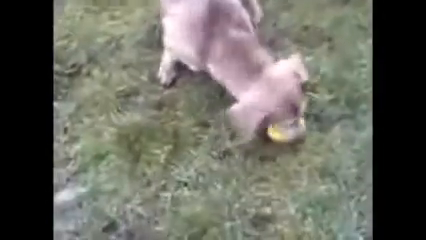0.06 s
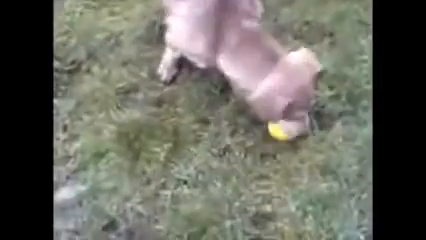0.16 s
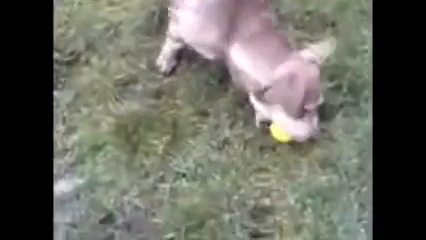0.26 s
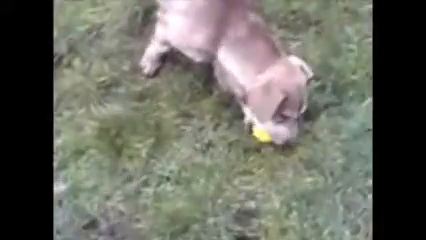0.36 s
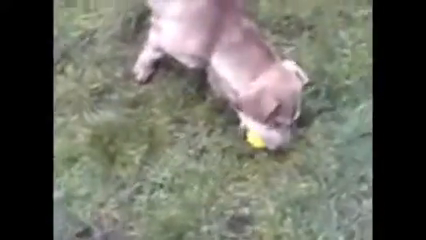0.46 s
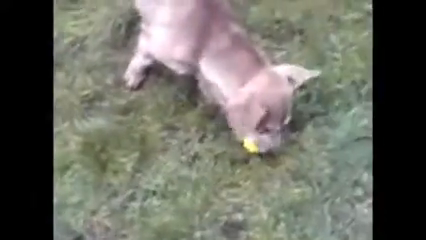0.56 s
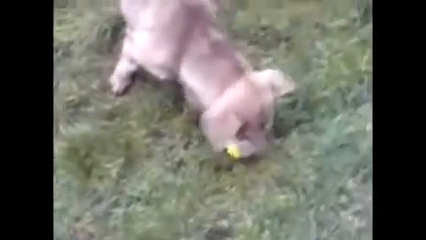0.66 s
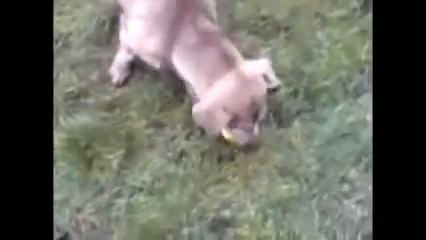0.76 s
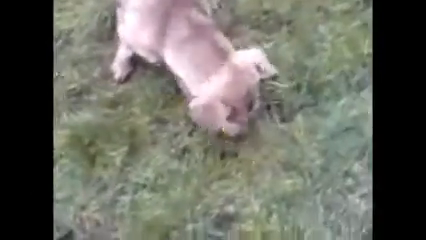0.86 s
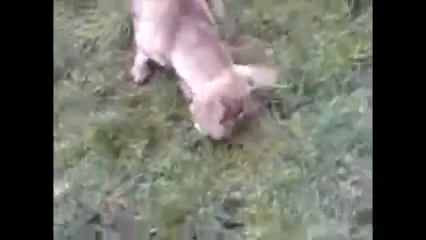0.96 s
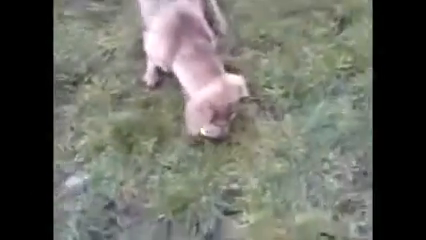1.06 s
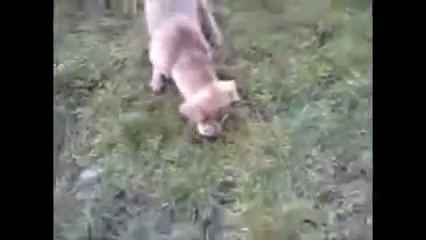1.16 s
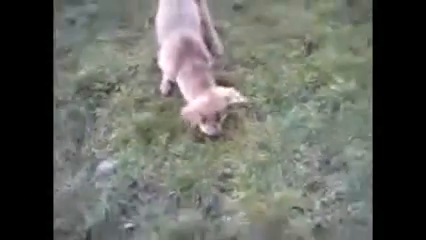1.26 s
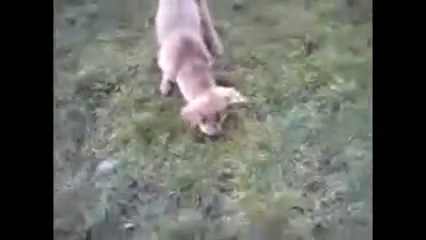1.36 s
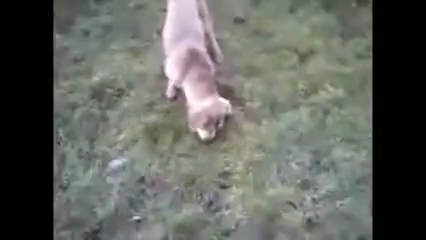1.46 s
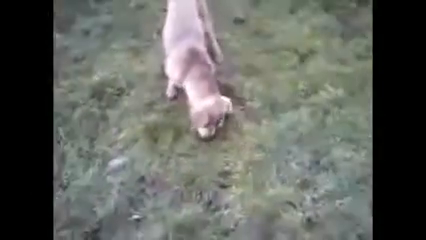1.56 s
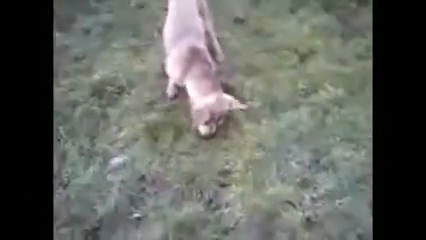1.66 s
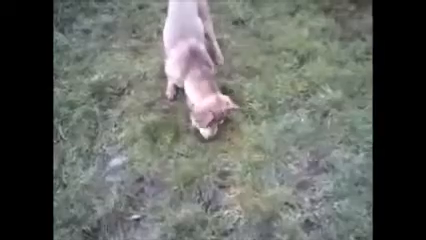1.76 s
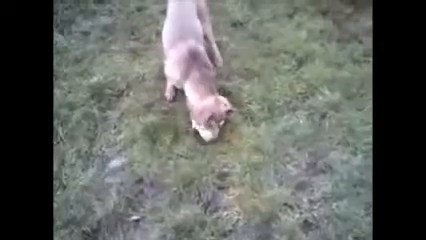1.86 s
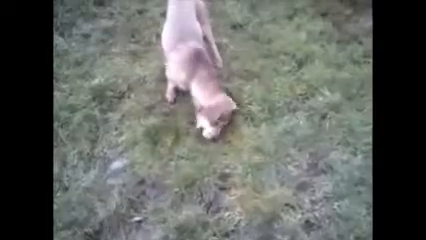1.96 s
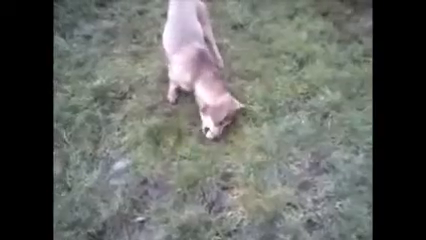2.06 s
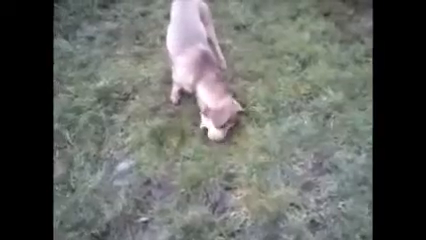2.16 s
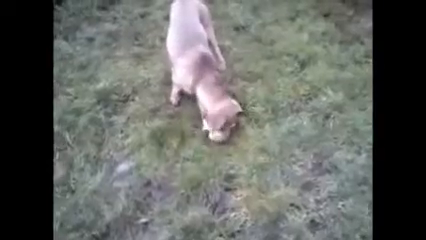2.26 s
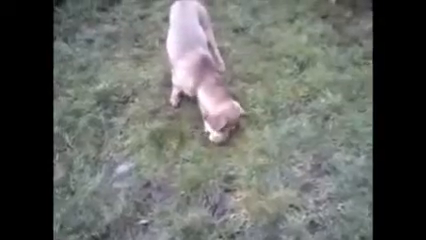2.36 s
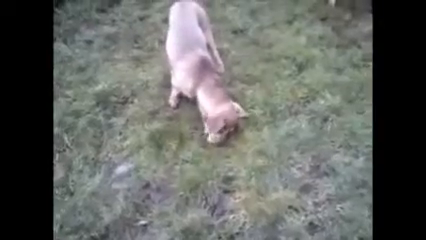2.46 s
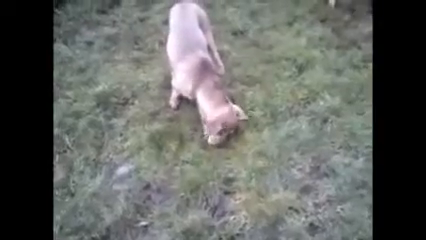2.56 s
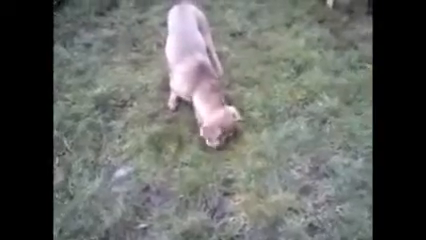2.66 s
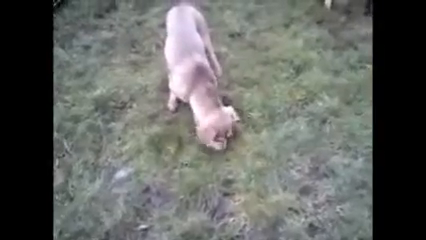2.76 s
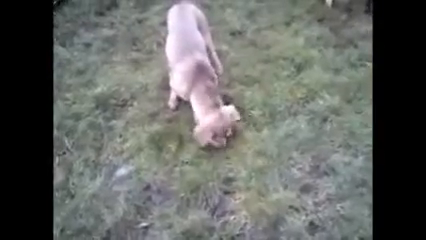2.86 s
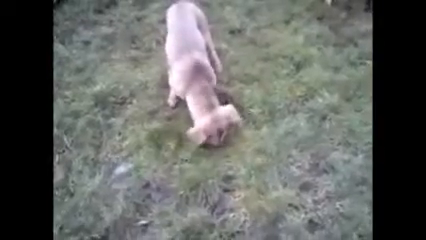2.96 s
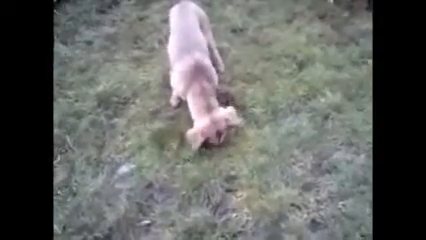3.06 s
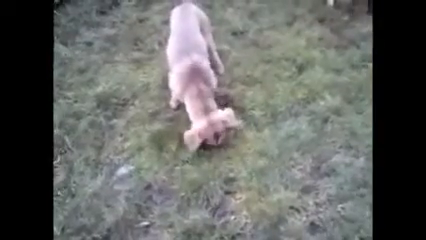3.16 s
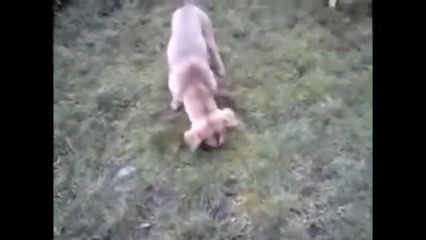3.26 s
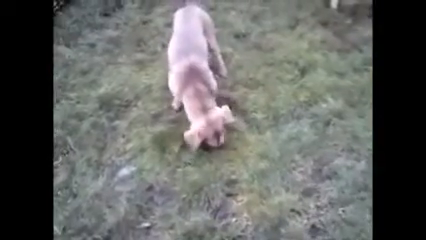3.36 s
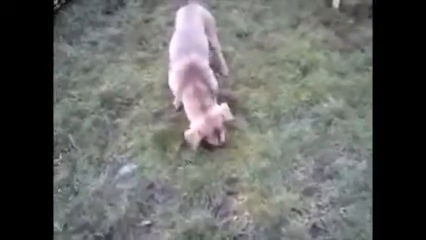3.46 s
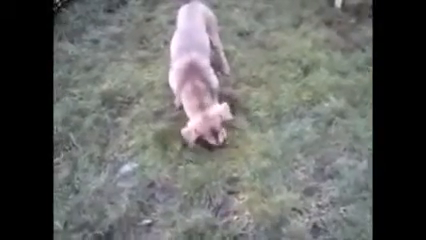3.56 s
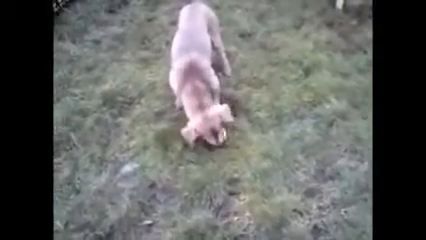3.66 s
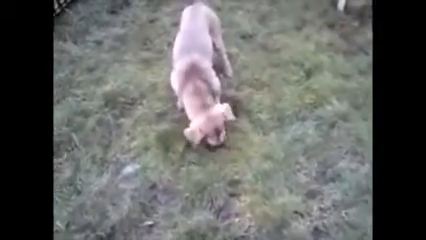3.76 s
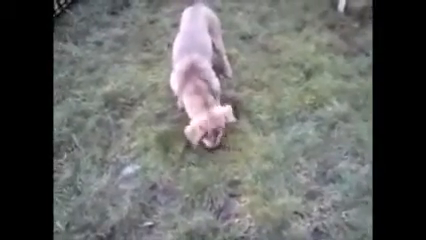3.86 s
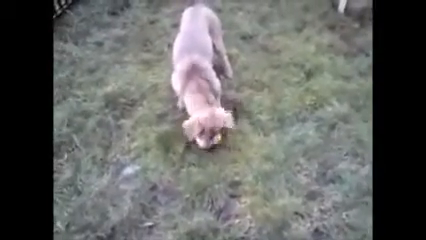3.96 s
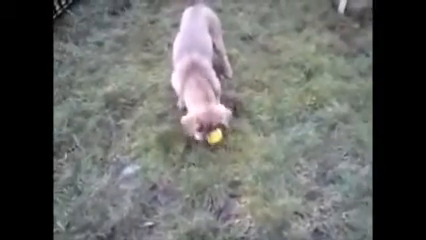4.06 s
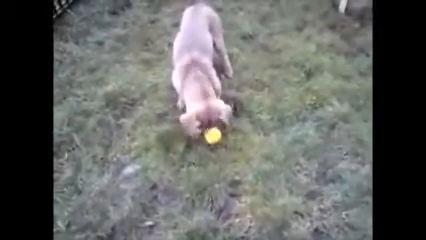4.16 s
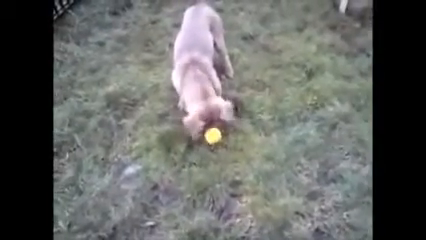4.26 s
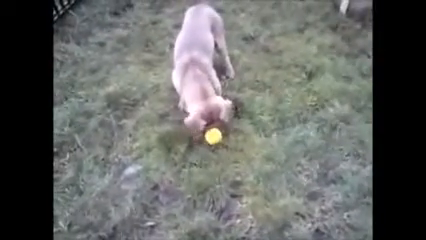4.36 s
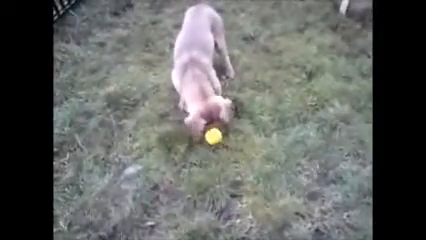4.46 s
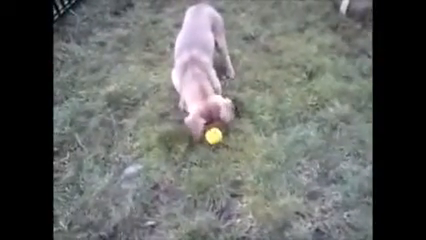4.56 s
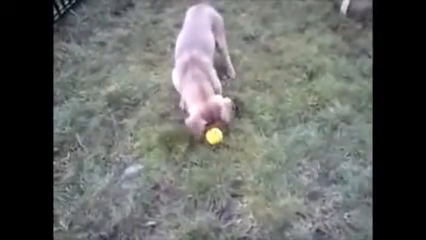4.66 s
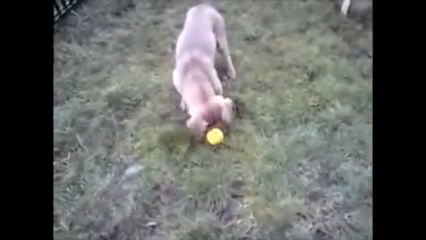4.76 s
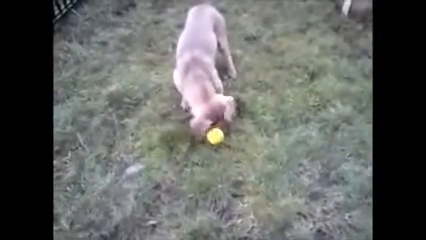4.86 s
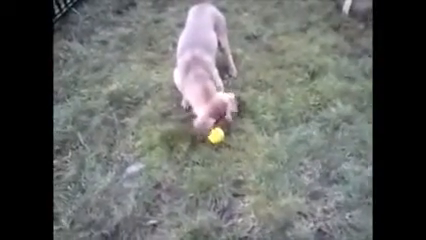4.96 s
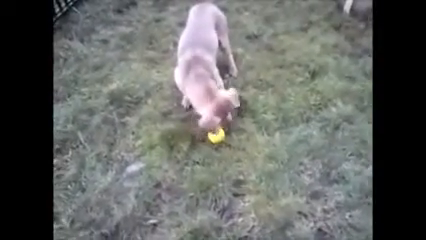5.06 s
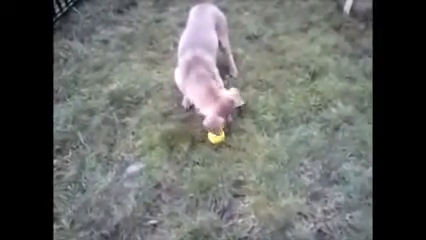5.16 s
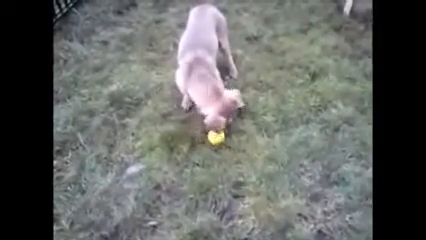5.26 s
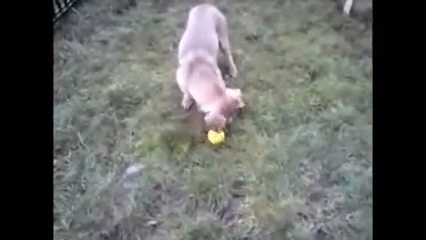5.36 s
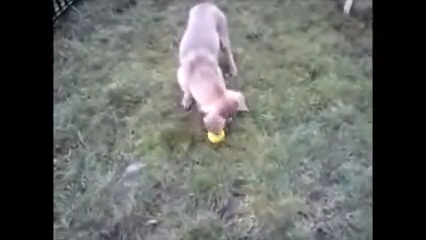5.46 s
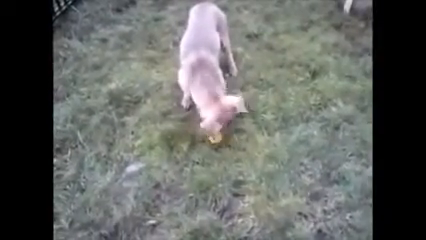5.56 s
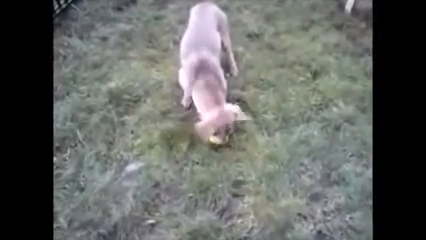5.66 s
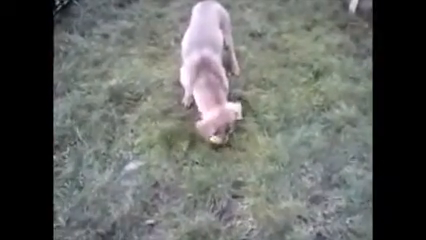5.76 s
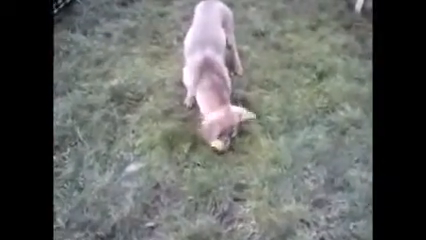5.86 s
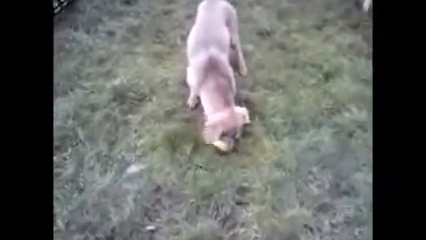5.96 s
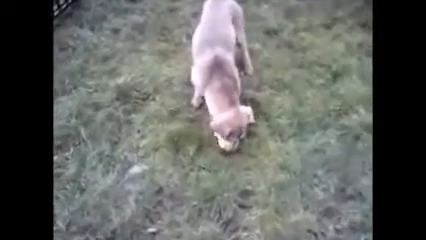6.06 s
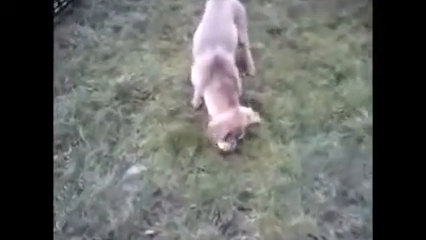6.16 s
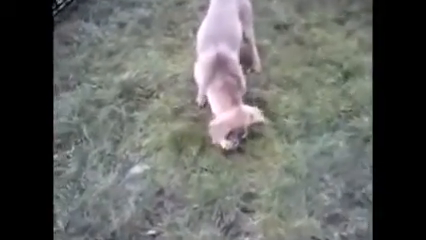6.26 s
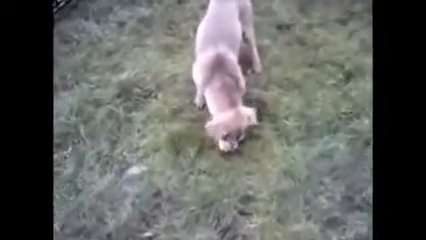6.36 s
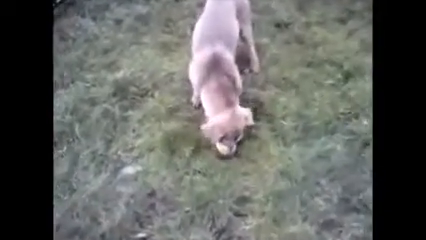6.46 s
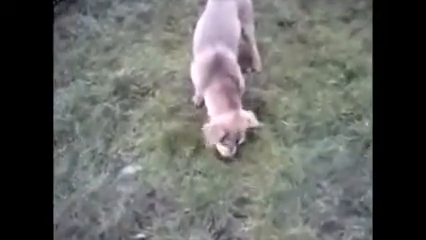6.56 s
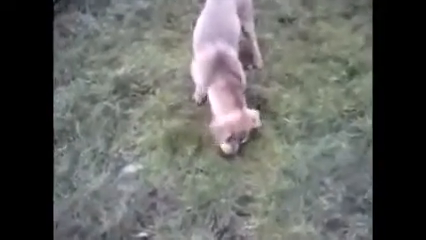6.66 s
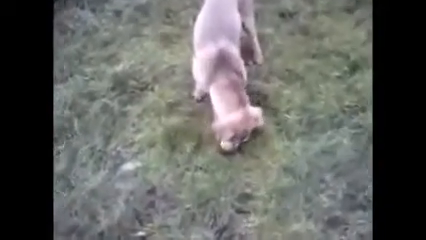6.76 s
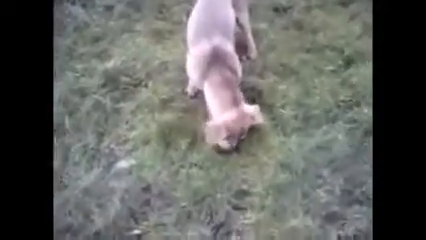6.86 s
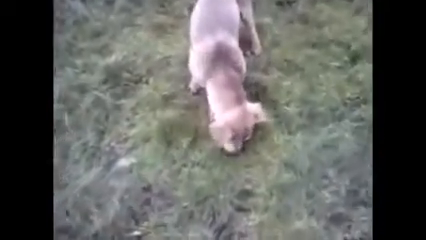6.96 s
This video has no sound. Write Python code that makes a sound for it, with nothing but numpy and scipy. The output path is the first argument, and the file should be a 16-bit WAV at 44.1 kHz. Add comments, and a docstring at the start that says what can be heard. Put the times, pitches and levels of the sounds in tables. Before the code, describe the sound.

Fast, irregular squeaks from a chewed rubber toy, loud and slightly distorted, with short yard echoes. High squeals alternate with lower rasping in-breaths of air that climb and break into whistles, plus airy puffs and soft knocks. The run thins out by four seconds; a calm stretch of low hum, dull outdoor noise and faint distant calls follows, before the squeaking resumes near the end and is cut off mid-squeal. Handheld, lo-fi, automatic gain pumping.

```python
"""A squeaky rubber ball, chewed by a puppy on a lawn: each bite drives air out through the reed,
giving a falling chirp and an arched squeal. The released ball sucks air back with a lower buzz that
climbs, breaks up and ends as a whistle. The reed's harmonics sweep through chamber and tube resonances;
noise bursts make pops and tooth ticks, all echoed by the yard. Dry hiss, thuds, faint calls and an
outdoor wash with a hum are added; gain control ducks everything after loud squeaks."""
import sys
import numpy as np
from scipy import signal
from scipy.fft import rfft, irfft
from scipy.io import wavfile
from scipy.ndimage import uniform_filter1d, map_coordinates

SR = 44100
rng = np.random.default_rng(int(sys.argv[2]) if len(sys.argv) > 2 else 0)


def generate_wav(sig):
    """Save sig (samples, or channels by samples) to the path in sys.argv[1] as 16-bit PCM at SR."""
    pcm = np.round(np.clip(np.atleast_2d(sig).T, -1, 1) * 32767).astype(np.int16)
    wavfile.write(sys.argv[1], SR, pcm)


N = 310023
T = np.arange(N) / SR

# outdoor background before its gain: (time [s], level [dB])
YARD_LEVEL = [(0, -45), (2, -43.5), (3.2, -45), (4.2, -45), (4.7, -49.5), (5.7, -49.5), (6.1, -47),
              (7.03, -45.5)]
# spectrum of the outdoor background: (frequency [Hz], relative level [dB])
YARD_SPECTRUM = [(15, -26.5), (25, -5), (90, -5), (160, -7.5), (310, -11), (440, -12.5), (540, -10.5),
                 (920, -8.5), (1600, -15), (3000, -22.5), (5500, -24.5), (7800, -31.5), (9000, -68.5)]
# soft low thuds: (time [s], half width to 1/e [s], level [dB])
THUDS = [(2.817, 0.02, -34.5), (4.014, 0.039, -40)]
# faint far-off calls: (time [s], length [s], top pitch [Hz], level [dB])
FAR_CALLS = [(0.237, 0.089, 1724, -39.5), (0.346, 0.082, 1480, -37), (4.9, 0.504, 451, -53),
             (5.727, 0.01, 1105, -33), (5.911, 0.094, 715, -36)]
# spectrum of hissing air: (frequency [Hz], relative level [dB])
AIR_SPECTRUM = [(600, -29.5), (1300, 4.5), (2300, 17), (3200, 6), (4300, 9.5), (5600, 10), (7800, 3),
                (9000, -66)]
# air through the hole with the reed silent: (peak time [s], rise [s], fall [s], level before flutter [dB])
PUFFS = [(0.5, 0.061, 0.047, -39), (1.265, .03, 0.074, -24.5), (2.69, 0.06, 0.019, -39),
         (3.11, 0.024, 0.041, -26), (3.234, 0.017, 0.053, -28.5), (3.532, 0.0097, 0.015, -38),
         (5.66, 0.064, 0.12, -51.5), (6.064, 0.084, 0.1, -44), (6.85, 0.037, 0.084, -33)]
# the rubber wall pops in or out: (time [s], level before the common gain [dB])
POPS = [(0.828, -22.5), (0.949, -18), (1.077, -32), (1.521, -24), (1.583, -18.5), (1.808, -21),
        (1.944, -28), (2.905, -24.5), (2.649, -30), (3.063, -26.5), (3.33, -20), (3.791, -27),
        (6.181, -24.5), (6.466, -20), (6.925, -27), (6.99, -15.5)]
# echoes off fences and house: (delay [s], level [dB])
ECHOES = [(.009, -16.5), (0.023, -17.5), (0.032, -38.5), (.052, -33.5)]
# resonances of the ball's chamber: (frequency [Hz], relative level [dB])
CHAMBER_RESPONSE = [(700, 3.5), (1200, -1.5), (1700, 8), (2300, 1), (3000, 2.5), (3800, -7), (4600, -6)]
# turbulence of the reed, which hardly speaks between buzz and whistle: (pitch [Hz], relative level [dB])
BREATHINESS = [(1200, 2.5), (1600, 1.5), (2400, 6), (3000, -0.5), (3900, 9.5), (4700, -9.5), (5500, -7)]
# teeth close, reed flips from whistle to buzz: (time [s], time to flip [s], time after flip [s],
# chamber offset [dB], tube offset [dB], tube resonance [Hz])
CHIRPS = [(0.812, 0.0068, 0.01, -11.5, -1, 4840), (1.289, 0.0058, 0.013, -13.5, -7, 5660),
          (1.781, .0215, 0.0084, -9.5, -24, 5000), (2.660, 0.0034, .012, -9, -43, 6230),
          (6.4844, .009, .011, -13, -9.5, 4900), (6.954, 0.0082, 0.0093, -6.5, -22.5, 5100)]
# chirp pitch at the start, before the flip, after the flip and at the end: (pitch [Hz])
CHIRP_PITCH = (5800, 3480, 1553, 1001)
# chirp's chamber part at those moments: (level before the offset [dB])
CHIRP_CHAMBER = (-25, -6.5, -4, -7)
# chirp's tube part at those moments: (level before the offset [dB])
CHIRP_TUBE = (1, -3.5, -1.5, -21)
# the jaw presses air out: (time [s], rise [s], hold [s], fall [s], first pitch [Hz], crest pitch [Hz],
# pitch as the jaw eases [Hz], last pitch [Hz], base chamber level [dB], base tube level [dB],
# tube resonance [Hz])
SQUEALS = [(0.847, 0.02, 0.12, 0.03, 2237, 2321, 2330, 1884, -6.5, -2, 5120),
           (1.343, .088, 0.092, 0.026, 2328, 2657, 2460, 1903, -6.5, -11.5, 5690),
           (1.824, 0.033, 0.096, 0.02, 2290, 2743, 2490, 1915, -10.5, -5, 5280),
           (2.216, 0.021, 0.065, 0.033, 2400, 2586, 2538, 1958, -14, -8, 5940),
           (2.724, 0.039, 0.18, 0.017, 2730, 2500, 2453, 2343, -15.5, -21, 5930),
           (3.593, 0.067, 0.074, 0.035, 2233, 2234, 2060, 1878, -16.5, -18, 6360),
           (3.846, 0.076, .066, .058, 2156, 2573, 2570, 1935, -12, -18.5, 6070),
           (6.523, 0.046, 0.061, 0.021, 2280, 2567, 2317, 1920, -13, -17, 5570),
           (6.994, 0.051, .020, .020, 2343, 2860, 2800, 2590, -3.5, -0.5, 5370)]
# the ball slips in the jaw and bends the squeal: (time [s], half width to 1/e [s], bend [octaves],
# squareness [exponent])
SLIPS = [(0.866, 0.011, 0.053, 2.7), (0.960, .014, .43, 1), (1.859, 0.012, 0.026, 1.6),
         (2.247, .018, .07, 1.7), (2.822, .008, -0.35, 1.9), (3.625, 0.028, -.23, 4)]
# the jaw lets go, air is sucked back: (time [s], length [s], runaway [s], first pitch [Hz],
# drift [octaves/s], first chamber level [dB], late chamber level before the break [dB],
# tube level before the break [dB], tube resonance [Hz])
BUZZES = [(0.571, 0.053, 0.019, 1226, 6.8, -9, -7, 3, 5440),
          (1.084, .048, 0.014, 1192, 5.2, -21.5, 0, 2, 5130),
          (1.593, 0.081, .016, 1211, 3.2, -16.5, -1.5, -15, 5340),
          (1.996, 0.085, 0.011, 1219, 1.8, -18.5, -9.5, -10.5, 4380),
          (2.403, .066, 0.018, 1160, 2.63, -19, -21.5, -11.5, 5940),
          (3.07, 0.064, 0.023, 1101, 3.12, -26, -11.5, -32, 5900),
          (6.187, 0.091, 0.012, 1169, 0.74, -20.5, -22, -8.5, 5620),
          (6.673, 0.062, 0.023, 1179, 2.5, -16, -1, -11, 5100)]
# little air left to move: (time [s], length [s], first pitch [Hz], last pitch [Hz],
# first tube level [dB], last tube level [dB], tube resonance [Hz])
WHISTLES = [(0.634, 0.037, 5650, 7400, 8, -11, 5300), (1.135, 0.019, 5480, 7180, 4, -3, 5270),
            (1.679, .050, 4620, 5250, -19.5, -16, 5430), (2.48, 0.013, 5240, 5910, -17, 0, 5900),
            (3.154, 0.0084, 5200, 5880, -22, -14, 5760), (3.55, 0.037, 5540, 5380, -34.5, -27.5, 5600),
            (6.285, 0.02, 4600, 5300, -12, 2, 5600), (6.735, .044, 4700, 6160, -9, -7.5, 5140)]
# brief swells and dips of squeals and buzzes: (time [s], half width to 1/e [s], chamber change [dB],
# tube change [dB])
SWELLS = [(0.846, 0.0085, -3, -10), (0.892, 0.04, 1, -14), (0.939, 0.022, 4.5, 7.5),
          (1.367, 0.011, -9.5, -10), (1.405, 0.016, -2, -11), (1.462, 0.018, 1, 6.5),
          (1.824, 0.007, -1, -8), (2.0, 0.011, -1.5, -9), (1.891, 0.027, 0.5, 1.5),
          (2.212, 0.0071, -7.5, 6), (2.233, 0.024, 6, 0), (2.733, .01, 7, 0.5), (2.78, 0.09, -1, 2),
          (2.822, 0.0067, -5.5, -5.5), (2.87, .018, 3.5, 0), (2.945, 0.049, -7, -17.5),
          (3.745, 0.017, -7, -20), (3.843, 0.012, 0, -10), (3.956, 0.044, -21, -6), (4.007, 0.014, 9, 5),
          (6.266, 0.0079, 9.5, -0.5), (6.572, 0.0097, -16, -19)]

FLIP_HALF_S = 0.0017  # half the duration of the chirp's flip
RISE_POWER, SAG_POWER = 1.3, 1.3  # how early the crest is reached; how late in the hold the pitch sags
BRIGHT_DB_PER_OCTAVE = 36.5  # tube level follows pitch, as overtones grow with pressure
STALL_CHAMBER_DB, STALL_TUBE_DB = -4.5, -7.5  # change as the reed stalls
BREAK_HZ, BREAK_CHAMBER_DB, BREAK_TUBE_DB = 3434, -6, -7  # buzz's last pitch; change in the last rush
TUBE_WIDTH_HZ = 460  # offset at which the tube's gain is halved, for all but squeals
SAMPLING_HZ, TOP_HZ = 16000, 8000  # low sampling rate and the top of its band


def undb(db):
    """Logarithmic level: decibels to amplitude gain."""
    return 10 ** (np.asarray(db) / 20)


def unit(x):
    """Mean power: scale to rms 1."""
    return x / np.sqrt(np.mean(x ** 2) + 1e-18)


def colour(hz, points):
    """Frequency response: gain interpolated over log frequency."""
    f, db = np.transpose(points)
    return undb(np.interp(np.log(hz + 1), np.log(f), db))


def noise(points, size=N):
    """Spectral shaping: white noise filtered to a given spectrum, at rms 1."""
    spectrum = rfft(rng.standard_normal(size))
    hz = np.arange(size // 2 + 1) * SR / size
    return unit(irfft(spectrum * colour(hz, points), size))


def walk(rate, size=N):
    """Band-limited fluctuation: random points at the given rate [Hz], smoothly joined."""
    at = np.arange(size) * rate / SR
    points = rng.standard_normal(int(at[-1]) + 2)
    return map_coordinates(points, [at], order=2, mode="nearest")


def add(out, start, x):
    """Superposition: mix x into out from the given time [s]."""
    i = max(int(start * SR), 0)
    out[i:i + len(x)] += x[:max(N - i, 0)]


def background(gain_db=3, hum_hz=122, hum_db=-7):
    """Broadband and tonal sources combined: an outdoor wash and a wavering low hum."""
    hum_phase = 2 * np.pi * np.cumsum(hum_hz + 0.5 * walk(2.7)) / SR
    hum = np.sin(hum_phase) * undb(hum_db + 1.9 * walk(9.2))
    wash = noise(YARD_SPECTRUM) * undb(gain_db + 0.55 * walk(12))
    return (wash + hum) * undb(np.interp(T, *np.transpose(YARD_LEVEL)))


def thuds():
    """Low-frequency impulses: bass noise under smooth bell envelopes."""
    push = sum(undb(db) * np.exp(-((T - s) / width) ** 2) for s, width, db in THUDS)
    return noise([(20, -6), (60, 8), (110, -20), (250, -30.5), (1000, -75)]) * push


def far_calls(droop=0.128):
    """Frequency modulation: thin far-off tones with arched pitch and level."""
    out = np.zeros(N)
    for s, length, hz, db in FAR_CALLS:
        u = np.linspace(-1, 1, int(length * SR))
        pitch = hz * (1 - droop * u ** 2 + .015 * walk(250, size=len(u)))
        tone = np.sin(2 * np.pi * np.cumsum(pitch) / SR)
        add(out, s, tone * (1 - u ** 2) * undb(db))
    return out


def air(flutter_db=2.0, leak_db=-25, leak_s=0.008, refill_db=-27, refill_s=0.089, swell_s=0.0099):
    """Turbulent flow: hiss in puffs, leaking around each reed onset and sighing on as the ball refills."""
    flow = 0
    for s, rise, fall, db in PUFFS:
        flow = flow + undb(db) * np.exp(-((T - s) / np.where(T < s, rise, fall)) ** 2)
    for s, *_, chamber_db, tube_db, _ in CHIRPS + SQUEALS + BUZZES:
        leak = np.exp(-np.minimum(np.abs(T - s) / leak_s, 20))
        flow = flow + undb(max(chamber_db, tube_db) + leak_db) * leak
    for s, length, *_ in BUZZES:
        age = T - s - length  # since the buzz ended
        refill = np.exp(-np.minimum(np.abs(age) / np.where(age < 0, swell_s, refill_s), 20))
        flow = np.hypot(flow, undb(refill_db) * refill)
    return noise(AIR_SPECTRUM) * flow * undb(flutter_db * walk(90))


def teeth(per_s=9, db=-47, spread_db=4):
    """Stick-slip friction: tiny ticks at random moments as teeth slip on rubber."""
    t = T[:256]
    tick = noise(AIR_SPECTRUM, size=len(t)) * np.exp(-t / 0.00095)
    happens = rng.random(N) < per_s / SR
    slips = happens * undb(db + spread_db * rng.standard_normal(N))
    return signal.fftconvolve(slips, tick)[:N]


def pops(decay_s=0.0058, gain_db=-1):
    """Buckling of a soft shell: a dull, quickly damped knock."""
    out, t = np.zeros(N), T[:2048]
    for s, db in POPS:
        knock = noise([(60, -10.5), (250, -4), (700, -0.5), (1500, -9), (6000, -51)], size=len(t))
        envelope = (1 - np.exp(-t / 0.0019)) * np.exp(-t / decay_s)
        add(out, s, knock * envelope * undb(db + gain_db))
    return out


def yard(x, t60=0.25, tail_db=-26):
    """Reflection and scattering: distinct echoes and a short diffuse tail join the direct sound."""
    t = T[:SR // 2]
    response = noise([(200, -10.5), (2300, 9.0), (5500, 4), (8000, -21.5)], size=len(t))
    response *= np.exp(-np.log(1000) * t / t60) * np.clip(t / 0.069, 0, 1)
    response *= undb(tail_db) / np.sqrt(np.sum(response ** 2))
    for delay, db in ECHOES:
        response[int(delay * SR)] += undb(db)
    return x + signal.fftconvolve(x, response)[:N]


def chirp(s, before, after, chamber_db, tube_db):
    """Mode jump: a whistle tumbles to a buzz; rows are (time [s], pitch [Hz], chamber [dB], tube [dB])."""
    flip_start = max(before - FLIP_HALF_S, 1e-4)
    t = s + np.array([0, flip_start, before + FLIP_HALF_S, before + max(after, FLIP_HALF_S)])
    return np.transpose([t, CHIRP_PITCH, np.add(CHIRP_CHAMBER, chamber_db), np.add(CHIRP_TUBE, tube_db)])


def squeal(s, rise, hold, fall, first_hz, crest_hz, eased_hz, last_hz, chamber_db, tube_db):
    """Pressure-controlled pitch: it arches with the jaw's force, then drops until the reed stalls."""
    t = np.arange(s, s + rise + hold + fall, 1e-3)
    rising = np.clip((t - s) / rise, 0, 1)
    sagging = np.clip((t - s - rise) / hold, 0, 1)
    falling = np.clip((t - s - rise - hold) / fall, 0, 1)
    hz = crest_hz + (first_hz - crest_hz) * (1 - rising) ** RISE_POWER
    hz = hz + (eased_hz - crest_hz) * sagging ** SAG_POWER + (last_hz - eased_hz) * falling
    tube_db = tube_db + BRIGHT_DB_PER_OCTAVE * np.log2(hz / crest_hz) + STALL_TUBE_DB * falling
    for at, width, octaves, squareness in SLIPS:
        hz = hz * 2 ** (octaves * np.exp(-np.abs((t - at) / width) ** squareness))
    return np.transpose([t, hz, chamber_db + STALL_CHAMBER_DB * falling, tube_db])


def buzz(s, length, runaway_s, first_hz, drift, first_db, late_db, tube_db):
    """Runaway instability: the pitch creeps as the ball refills, then rushes upward."""
    u = np.linspace(0, 1, 64)
    rush = np.exp((u - 1) * length / runaway_s)
    creep_hz = first_hz * 2 ** (drift * u * length)
    hz = creep_hz * (BREAK_HZ / creep_hz[-1]) ** (rush * u)
    chamber_db = first_db + (late_db - first_db) * u ** 2 + BREAK_CHAMBER_DB * rush ** 2
    return np.transpose([s + u * length, hz, chamber_db, tube_db + BREAK_TUBE_DB * rush])


def whistle(s, length, first_hz, last_hz, first_db, last_db, chamber_db=-15):
    """Weak-flow oscillation: one glide, its chamber level set relative to the tube's."""
    first = (s, first_hz, first_db + chamber_db, first_db)
    last = (s + length, last_hz, last_db + chamber_db, last_db)
    return np.array([first, last])


def swell(rows):
    """Amplitude modulation: brief swells and dips laid over a squeak's course."""
    t, hz, chamber_db, tube_db = np.transpose(rows)
    for at, width, chamber_change, tube_change in SWELLS:
        bell = np.exp(-((t - at) / width) ** 2)
        chamber_db = chamber_db + chamber_change * bell
        tube_db = tube_db + tube_change * bell
    return np.transpose([t, hz, chamber_db, tube_db])


def reed(rows, tube_hz, tube_width_hz, rough, break_rough, jitter, rasp_db, edge_s,
         waver=0.0038, flutter_db=5.0, settle_s=0.013):
    """Source-filter principle: the reed's harmonics sweep through fixed chamber and tube resonances."""
    s, pitch, chamber_db, tube_db = np.transpose(rows)
    t = np.arange(s[0] - edge_s / 2, s[-1] + edge_s, 1 / SR)
    hz = np.exp(uniform_filter1d(np.interp(t, s, np.log(pitch)), size=130))
    # the reed beats unsteadily as it starts and whenever its pitch slides fast
    slide = np.abs(np.gradient(np.log(hz))) * SR / 25
    onset = .5 * np.exp(-(t - t[0]) / settle_s)
    unrest = rough + break_rough * np.clip(slide + onset, 0, 1)
    hz = hz * (1 + jitter * unrest * walk(1100, size=len(t)) + waver * walk(110, size=len(t)))
    phase = 2 * np.pi * np.cumsum(hz) / SR
    k = np.arange(1, 8)[:, None]  # harmonic numbers
    partials = k * hz
    # low partials belong to the chamber, high ones to the tube
    in_tube = np.clip((partials - 3900) / 600, 0, 1)
    chamber = colour(partials, CHAMBER_RESPONSE) * (1 - in_tube)
    detune = (partials - tube_hz) / tube_width_hz
    tube = in_tube * (partials < SAMPLING_HZ) / (1 + detune ** 2)
    gains = 0
    for shape, db in ((chamber, chamber_db), (tube, tube_db)):
        strength = np.sqrt(np.sum(shape ** 2, axis=0) + 0.0069)
        gains = gains + shape / strength * undb(np.interp(t, s, db))
    # each partial's phase turns as it crosses the tube resonance
    tone = np.sqrt(2) * np.sum(gains * np.sin(k * phase - 2 * np.arctan(detune)), axis=0)
    tone *= undb(flutter_db * unrest * walk(330.5, size=len(t)))
    # an unsteady reed turns part of the flow into turbulence
    share = unrest * undb(rasp_db) * colour(hz, BREATHINESS)
    rasp = noise(AIR_SPECTRUM, size=len(t)) * np.sqrt(np.sum(gains ** 2, axis=0))
    gate = np.clip(np.minimum(t - t[0], t[-1] - t) / edge_s, 0, 1)
    return t[0], gate * (tone + share * rasp) / np.sqrt(1 + share ** 2)


def squeaker():
    """Flow-driven reed: bites chirp and squeal; returning air buzzes, breaks up and whistles."""
    out = np.zeros(N)
    for *row, hz in CHIRPS:
        add(out, *reed(chirp(*row), hz, TUBE_WIDTH_HZ, rough=0.1, break_rough=.7,
                       jitter=.04, rasp_db=-6.5, edge_s=.002))
    for *row, hz in SQUEALS:
        add(out, *reed(swell(squeal(*row)), hz, tube_width_hz=273, rough=0.016, break_rough=1.0,
                       jitter=0.029, rasp_db=-16, edge_s=0.0039))
    for *row, hz in BUZZES:
        add(out, *reed(swell(buzz(*row)), hz, TUBE_WIDTH_HZ, rough=0.076, break_rough=0.94,
                       jitter=.026, rasp_db=-8, edge_s=.004))
    for *row, hz in WHISTLES:
        add(out, *reed(whistle(*row), hz, TUBE_WIDTH_HZ, rough=0.22, break_rough=0.68,
                       jitter=.017, rasp_db=-5.5, edge_s=.004))
    return out


def scene():
    """Superposition: the echoing toy joins the unechoed air, calls, background and thuds."""
    toy = yard(squeaker() + pops() + teeth())
    return (toy + air() + far_calls() + background() + thuds())[None]


def gain_control(x, limit_db=-13.0, ratio=4, recover_db_per_s=35):
    """Dynamic compression: loud squeaks turn the gain down quickly; it creeps back up afterwards."""
    power = uniform_filter1d(x ** 2, size=220, origin=-30)
    level_db = 10 * np.log10(np.maximum(power, 1e-12))
    over_db = np.maximum(level_db - limit_db, 0) * (1 - 1 / ratio)
    recovery_db = recover_db_per_s * T
    cut_db = np.maximum.accumulate(over_db + recovery_db, axis=-1) - recovery_db
    return x * undb(-uniform_filter1d(cut_db, size=90))


def record(dry, fold_db=-9, ceiling=0.89):
    """Compression, saturation and aliasing: peaks are rounded, high overtones fold back into the band."""
    held = gain_control(dry)
    rounded = held / (1 + (held / ceiling) ** 6) ** (1 / 6)
    folded = rounded * (1 + 2 * undb(fold_db) * np.cos(2 * np.pi * SAMPLING_HZ * T))
    lowpass = signal.ellip(8, .2, 70, TOP_HZ, fs=SR, output="sos")
    return signal.sosfilt(lowpass, folded)


dry = scene()
out = record(dry)
generate_wav(out)
```